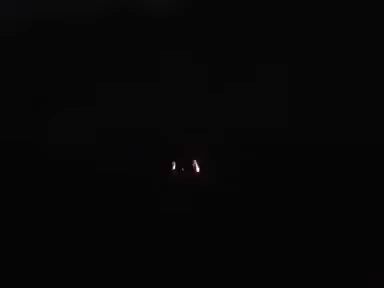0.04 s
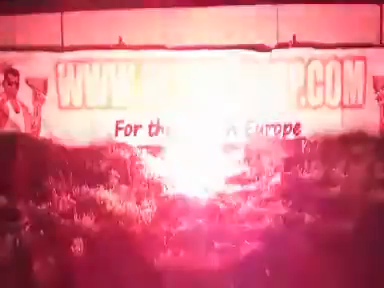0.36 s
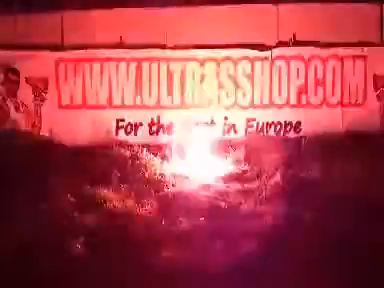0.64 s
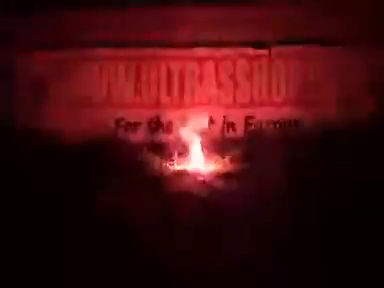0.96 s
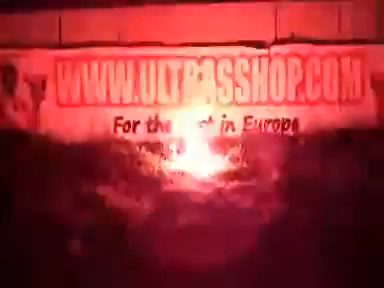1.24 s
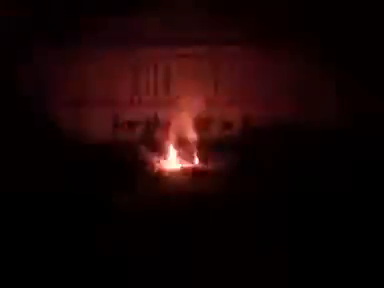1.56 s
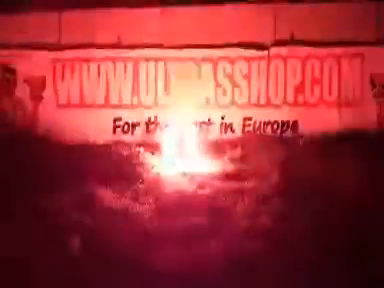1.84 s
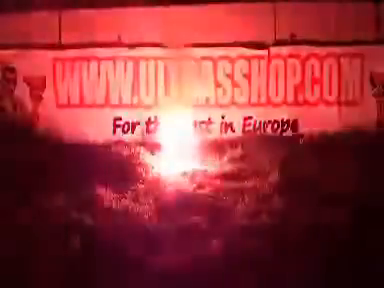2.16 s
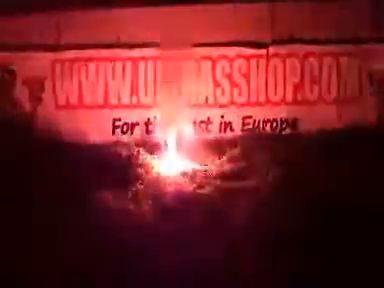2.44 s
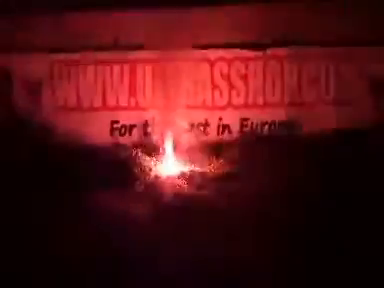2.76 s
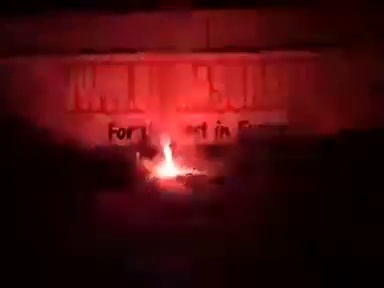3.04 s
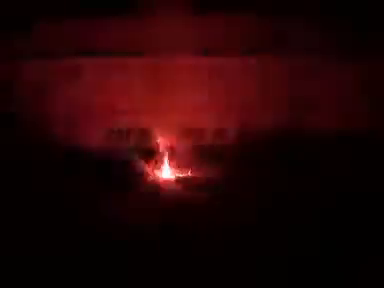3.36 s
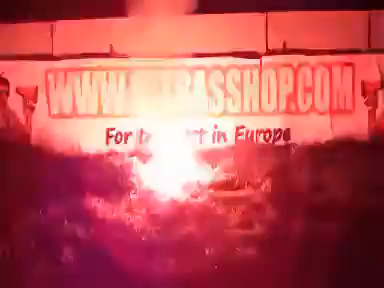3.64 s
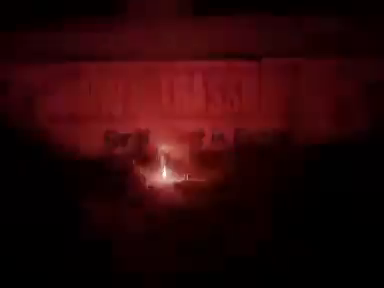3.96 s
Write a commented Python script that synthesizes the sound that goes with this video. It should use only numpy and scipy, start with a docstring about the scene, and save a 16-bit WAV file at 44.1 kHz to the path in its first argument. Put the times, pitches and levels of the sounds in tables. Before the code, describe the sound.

A burning flare hisses in surges, crackling and spitting outdoors.

```python
"""Outdoors at night, about two metres in front of a wall: a strobe flare burns on the ground.
Gas and countless bursting grains make a hiss that surges with the burn.
The turbulent flame roars low and flares up once; larger grains spit.
The wall returns a short echo. A dull outdoor rumble lies behind."""
import sys
import numpy as np
from scipy import signal
from scipy.fft import rfft, irfft
from scipy.io import wavfile

SR = 44100
rng = np.random.default_rng(int(sys.argv[2]) if len(sys.argv) > 2 else 0)


def put_to_file(sound):
    """Save the sound as 16-bit audio at rate SR, in the file named by the first command-line argument."""
    columns = np.atleast_2d(sound).T  # one column per channel
    safe = np.clip(columns, -1, 1)
    whole_steps = np.round(safe * 32767)
    wavfile.write(sys.argv[1], SR, whole_steps.astype(np.int16))


N = 176400

# Envelopes. Each row: time in seconds, relative level in dB.
AIR_LEVEL = [(.13, -41.5), (.55, -41.5), (1.0, -43), (2.5, -43.5), (4.0, -43.5)]
ROAR_LEVEL = [(.13, -65), (.4, -53.5), (.6, -46), (.67, -42), (.8, -50.5), (.865, -41.5), (.96, -53),
              (1.3, -50.5), (1.43, -45), (1.56, -51), (1.62, -55), (1.78, -59), (1.98, -34.5),
              (2.58, -38.5), (2.73, -45), (3.0, -43.5), (3.085, -57), (3.125, -42), (3.2, -46), (3.34, -45),
              (3.5, -47.5), (3.785, -52.5), (3.825, -34.5), (3.89, -53), (4.0, -53)]
FLARE_UP_LEVEL = [(1.78, -67), (1.89, -32.5), (1.95, -18), (2.02, -20.5), (2.13, -24.5), (2.24, -32),
                  (2.6, -38.5), (2.75, -55)]
BURN_LEVEL = [(.13, -53), (.44, -41.5), (.52, -31), (.55, -31.5), (.58, -35.5), (.63, -33), (.71, -26.5),
              (.86, -23), (.96, -25), (.99, -32), (1.05, -27.5), (1.12, -29.5), (1.215, -22.5),
              (1.235, -30.5), (1.33, -32), (1.42, -21.5), (1.445, -26), (1.48, -22), (1.52, -31.5),
              (1.565, -24), (1.58, -35.5), (1.66, -36), (1.685, -40.5), (1.71, -36.5), (1.75, -41),
              (1.77, -32), (1.86, -19.5), (1.9, -23), (1.925, -17.5), (2.0, -20.5), (2.085, -22),
              (2.125, -20), (2.22, -25), (2.35, -27.5), (2.41, -23), (2.45, -31), (2.475, -24.5),
              (2.62, -24.5), (2.66, -20), (2.68, -30), (2.74, -26), (2.77, -30.5), (2.795, -20),
              (2.835, -25.5), (2.87, -19), (2.92, -26), (2.995, -18.5), (3.03, -26), (3.101, -26.5),
              (3.109, -18), (3.14, -20), (3.16, -25.5), (3.255, -21.5), (3.285, -25), (3.295, -19),
              (3.355, -19.5), (3.38, -27), (3.45, -33), (3.465, -25), (3.53, -25), (3.55, -32),
              (3.595, -36), (3.635, -21.5), (3.66, -30.5), (3.72, -39.5), (3.755, -48), (3.775, -23.5),
              (3.82, -16), (3.855, -24), (3.92, -31), (3.95, -33), (4.0, -30.5)]
# Single grain bursts. Each row: start in seconds, relative peak in dB.
SPITS = [(.6245, -17), (0.676, -13), (0.9483, -5), (1.044, -13), (1.0917, -5), (1.229, -2), (1.3024, -5),
         (1.348, -12), (1.4255, -8), (1.528, -10), (1.6162, -14), (1.6564, -12.5), (1.7006, -15),
         (1.7125, -18), (1.7253, -14), (1.7604, -9), (2.3661, -8), (2.7276, -23), (2.9181, -5),
         (3.1113, -7), (3.2783, -11), (3.293, -10), (3.4568, -10), (3.569, -15), (3.6097, -12),
         (3.7704, -15), (3.9373, -9), (3.958, -9)]
# Source and echo spectra. Each row: frequency in Hz, gain in dB.
AIR_SPECTRUM = [(20, -8), (45, -13.5), (85, 0), (150, -5.5), (330, -4), (500, 0), (640, -0.5), (800, 3.5),
                (1020, 0), (1300, -6), (1950, -6.5), (2500, -15), (5000, -13), (12500, -22)]
ROAR_SPECTRUM = [(30, -26), (80, -10.5), (145, -11.5), (180, -9.5), (202, 5), (232, -5.5), (266, 1),
                 (298, -8), (335, 1), (370, -7.5), (410, -1), (600, -13), (850, -9), (1200, -18),
                 (3000, -33.5)]
RUSH_SPECTRUM = [(300, -21.5), (800, -8), (1120, -18), (1400, 0), (1600, -6), (1950, 4.5), (2450, -4),
                 (2800, 1.5), (3300, -6), (3750, -2.5), (4900, -3.5), (6600, 2), (8200, -6.5), (9500, -25),
                 (12500, -34)]
SPIT_SPECTRUM = [(300, -26), (1500, -11), (4000, 1.5), (7000, 6), (9500, 5), (12500, -9)]
HISS_SPECTRUM = [(150, -37), (500, -23.5), (900, -19), (1150, -26), (1400, -17.5), (1650, -18),
                 (1980, -11.5), (2400, -17), (2850, -10), (3350, -14.5), (3900, -9), (4900, -10),
                 (5700, -2.5), (6650, 1), (7300, -1), (7850, 0), (8800, -4.5), (10800, -5.5), (12400, -9.5)]
WALL_SPECTRUM = [(200, -9), (3000, 3), (7000, 1.5), (12000, 2)]
# Stereo width. Each row: frequency in Hz, side minus mid in dB.
WIDTH = [(100, -31), (300, -20.5), (700, -15.5), (1200, -11), (2100, -22.5), (3200, -16), (4000, -19),
         (5200, -14.5), (8000, -15.5), (10000, -28), (12000, -14)]
# Stereo balance. Each row: frequency in Hz, left minus right in dB.
BALANCE = [(400, 0.25), (2000, -1), (4800, -1.6), (5500, -5), (6500, -1), (7500, 0), (12000, .1)]

TIME_S = np.arange(N) / SR
FLUTTER_PER_S, FLUTTER_DB = 110, 1.5  # uneven burn


def undb(db):
    """Decibels to gain."""
    return 10 ** (np.asarray(db) / 20)


def unit_rms(x):
    """Scale to rms 1."""
    return x / np.sqrt(np.mean(x ** 2))


def envelope(rows):
    """Gain per sample from (s, dB) rows."""
    return undb(np.interp(TIME_S, *np.array(rows).T))


def bin_gains(spectrum):
    """Gain per FFT bin from (Hz, dB) rows."""
    hz, db = np.array(spectrum).T
    bin_hz = np.arange(N // 2 + 1) * SR / N
    return undb(np.interp(np.log(bin_hz + 1), np.log(hz), db))


def colour(x, spectrum):
    """Minimum-phase filter with the given spectrum."""
    cepstrum = irfft(np.log(bin_gains(spectrum)), N)
    cepstrum[1:N // 2] *= 2
    cepstrum[N // 2 + 1:] = 0
    return irfft(rfft(x) * np.exp(rfft(cepstrum)), N)


def noise(spectrum):
    """Coloured noise, rms 1."""
    return unit_rms(colour(rng.standard_normal(N), spectrum))


def waver(rate_per_s, depth_db):
    """Randomly wandering gain."""
    return undb(depth_db * np.interp(TIME_S * rate_per_s, np.arange(N), rng.standard_normal(N)))


def night_air():
    """Dull, nearly steady outdoor rumble."""
    return noise(AIR_SPECTRUM) * envelope(AIR_LEVEL) * waver(rate_per_s=6.2, depth_db=0.5)


def wall(direct, delay_s=.0124, echo_db=-14, scatter_db=-13.5, t60_s=.1):
    """Direct sound, one wall echo and a faint tail scattered by ground and wall."""
    tail_s = np.arange(SR // 2) / SR
    tail = rng.standard_normal(len(tail_s)) * np.exp(-np.log(1000) * tail_s / t60_s)
    scatter = signal.fftconvolve(direct, tail / np.linalg.norm(tail))[:N]
    echo = np.pad(colour(direct, WALL_SPECTRUM), (int(delay_s * SR), 0))[:N]
    return direct + undb(echo_db) * echo + undb(scatter_db) * scatter


def near_scatter(mid, length_s=.04):
    """Narrow stereo: scatter near the listener differs slightly left and right."""
    response = rng.standard_normal(int(length_s * SR))
    side = signal.fftconvolve(colour(mid, WIDTH), response / np.linalg.norm(response))[:N]
    left_gain = np.sqrt(bin_gains(BALANCE))
    return irfft(np.array([rfft(mid + side) * left_gain, rfft(mid - side) / left_gain]), N)


def spits(gain_db=1):
    """Larger grains burst, one sharp snap each."""
    impulses = np.zeros(N)
    for start_s, peak_db in SPITS:
        impulses[int(start_s * SR)] += undb(peak_db + gain_db)
    snap = colour(signal.unit_impulse(N), SPIT_SPECTRUM)
    return signal.fftconvolve(impulses, snap / np.abs(snap).max())[:N]


def flame():
    """Turbulent flame: low roar, plus a throaty rush of gas at the flare-up."""
    roar = noise(ROAR_SPECTRUM) * envelope(ROAR_LEVEL) * waver(rate_per_s=45, depth_db=2.5)
    rush = noise(RUSH_SPECTRUM) * envelope(FLARE_UP_LEVEL) * waver(FLUTTER_PER_S, FLUTTER_DB)
    return roar + rush


def grain_bursts(rate_per_s, spread_db):
    """Tiny grains burst at random times and sizes; rms 1."""
    occurs = rng.random(N) < rate_per_s / SR
    size = undb(spread_db * np.minimum(rng.exponential(size=N), 3.5))
    polarity = np.sign(rng.standard_normal(N))
    return unit_rms(colour(occurs * size * polarity, HISS_SPECTRUM))


def hiss(full_burn_db=-20, catch_s=(.4, .65)):
    """Escaping gas and bursting grains. A weak burn is more crackly, a strong one throatier."""
    burn = envelope(BURN_LEVEL) / undb(full_burn_db)
    caught = np.interp(TIME_S, catch_s, (0, 1))  # crackle sets in as the flare catches
    gas = undb(-2.5) * noise(HISS_SPECTRUM) * burn
    sizzle = undb(-4.5) * grain_bursts(rate_per_s=7000, spread_db=3) * burn
    crackle = undb(-9.5) * grain_bursts(rate_per_s=330, spread_db=4.5) * caught * burn ** .58
    rush = undb(-36.5) * noise(RUSH_SPECTRUM) * burn ** 1.5
    return (undb(full_burn_db) * (gas + sizzle + crackle) + rush) * waver(FLUTTER_PER_S, FLUTTER_DB)


def scene():
    """Flare and wall echo over the night air, in stereo."""
    flare = hiss() + flame() + spits()
    return near_scatter(wall(flare) + night_air())


def record(dry):
    """Brief opening silence, soft-limited peaks, steep low-pass."""
    start_s, ceiling, cutoff_hz = .12, .55, 12400
    limited = dry / (1 + (dry / ceiling) ** 4) ** .25
    lowpass = signal.ellip(12, .2, 80, cutoff_hz, fs=SR, output="sos")
    return signal.sosfilt(lowpass, limited * (TIME_S >= start_s))


dry = scene()
out = record(dry)
put_to_file(out)
```